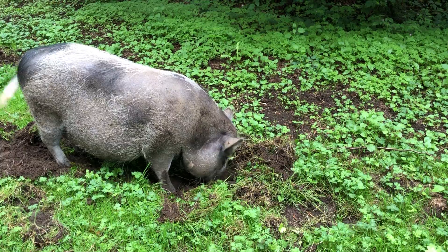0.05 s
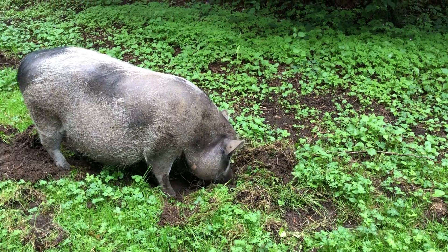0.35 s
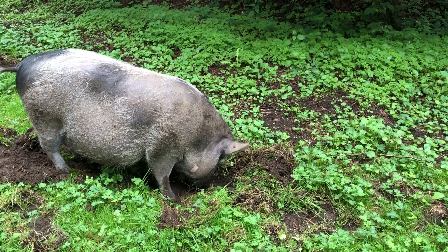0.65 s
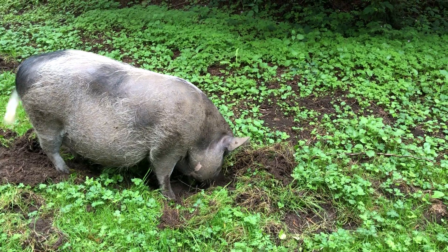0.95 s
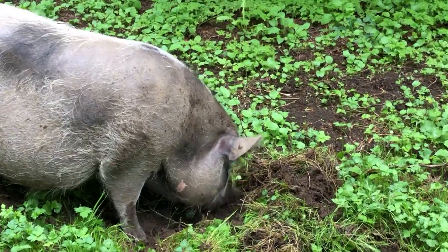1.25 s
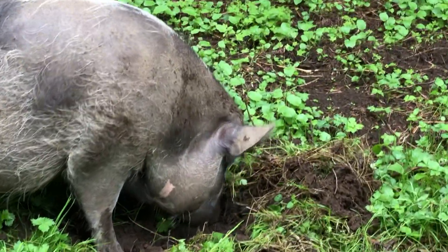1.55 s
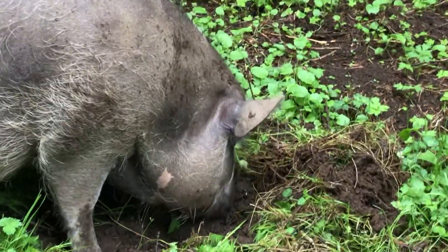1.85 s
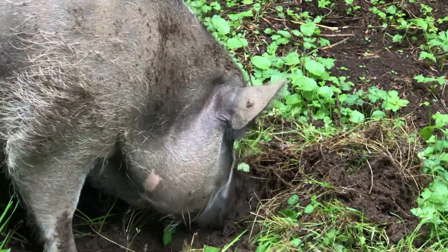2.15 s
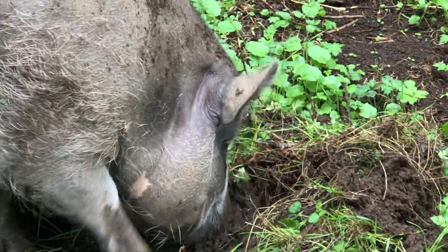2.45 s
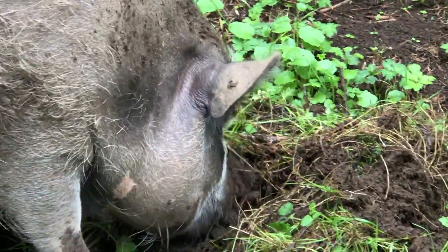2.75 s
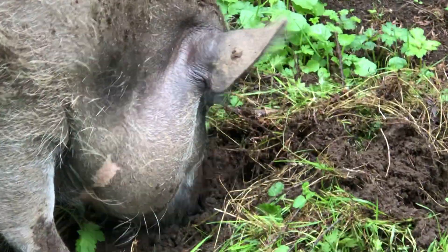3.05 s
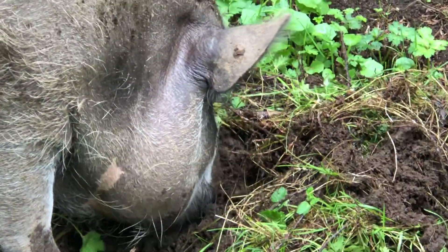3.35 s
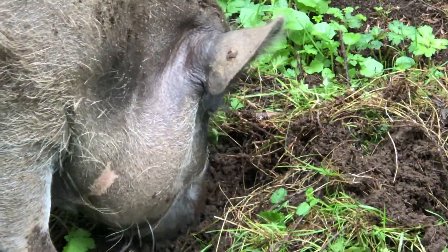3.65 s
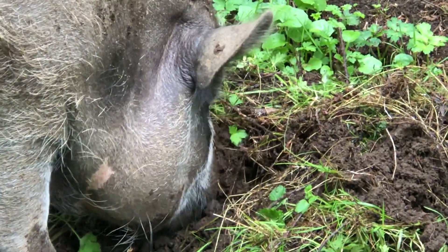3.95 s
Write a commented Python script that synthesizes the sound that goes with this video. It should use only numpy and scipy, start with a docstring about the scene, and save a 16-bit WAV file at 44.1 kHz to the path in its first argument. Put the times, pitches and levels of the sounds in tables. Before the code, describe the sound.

A pig digging with its snout, shoving earth and snapping roots over a distant rumble.

```python
"""A steady distant rumble and soft hiss, over which a pig roots in damp soil among low plants.
Soil and stalks rustle as crumbs break and blades are brushed. Small roots snap, each with a crack,
a short ring and a knock. The snout shoves clods with dull thuds.
Twice a small bird gives a thin note, then a rising whistle, reflected and scattered by trees.
A brief high squeak sounds at the top of the first whistle."""
import sys
import numpy as np
from scipy import signal
from scipy.fft import rfft, irfft
from scipy.io import wavfile

SR = 44100
rng = np.random.default_rng(int(sys.argv[2]) if len(sys.argv) > 2 else 0)


def unload_audio(sound):
    """Save the sound as a 16-bit wav file, at the path given as the first command line argument."""
    columns = np.transpose(np.atleast_2d(sound))
    # keep every value between -1 and 1, then stretch to whole-number steps
    steps = np.round(np.clip(columns, -1, 1) * 32767)
    wavfile.write(sys.argv[1], SR, steps.astype(np.int16))


N = 176400
T = np.arange(N) / SR

# distant rumble spectrum (frequency [Hz], density [dB/Hz])
RUMBLE_SPECTRUM = [(15, -115), (30, -95), (42, -84.5), (51, -77.5), (65, -74.5), (93, -69.5), (108, -68.5),
                   (135, -65.5), (160, -67), (210, -72), (320, -72), (400, -76.5), (540, -78.5),
                   (630, -85.5), (760, -79), (860, -83), (1100, -88.5), (1600, -88.5), (1900, -92.5),
                   (2250, -90.5), (2550, -102), (4000, -112), (8000, -135)]
# outdoor hiss spectrum at mid-scene (frequency [Hz], density [dB/Hz])
HISS_SPECTRUM = [(100, -108), (1500, -99), (2700, -95), (3500, -95.5), (4600, -98), (5120, -103.5),
                 (5530, -95.5), (6050, -101), (6650, -100.5), (8200, -105), (9400, -105.5), (11000, -110.5),
                 (12000, -108.5), (13000, -109.5), (15800, -108)]
# narrow drones in the rumble (frequency [Hz], resonator width [Hz], rms [dB])
RUMBLE_DRONES = [(105.65, 3.6, -52), (125.8, 8.3, -56.5), (177, 5.4, -59.5), (1000, 20, -68)]
# soil and stalk rustles (centre [s], length [s], soil rms at centre [dB], blades re soil [dB])
RUSTLE_SWELLS = [(0.112, 0.2, -53.5, -21), (0.367, 0.047, -59, 1), (.69, .3, -66, -10.5),
                 (2.373, .13, -59.5, -13)]
# root and stalk snaps (time [s], ring peak [dB], ring [Hz], ring Q [-], crack re ring [dB], tear [s])
ROOT_SNAPS = [(.0618, -44.5, 8400, 8, -20, .0008), (.0648, -39.5, 3700, 3, -22, .0006),
              (.0672, -38, 2900, 8, -24, .0006), (.1235, -47, 6000, 2, 0, .0006),
              (.1300, -45, 3100, 7, -22, .0006), (.1678, -46, 8400, 8, -14, .0008),
              (.3618, -38.5, 3350, 7, -16, .0006), (.3836, -38.5, 3400, 6, -13, .0005),
              (.3975, -49, 7500, 3, -16, .0006), (.5900, -44, 4200, 8, -20, .0005),
              (.6088, -47, 3800, 2, -14, .0004), (.6125, -45.5, 4400, 3, -18, .0008),
              (.6512, -43, 6700, 6, -20, .0007), (.6577, -45, 4800, 3, -16, .0003),
              (.6630, -42, 4700, 4, -18, .0005), (.6690, -46, 3900, 5, -20, .0009),
              (.6768, -48, 5000, 2, 0, .0003), (.6990, -50, 7000, 2, 4, .0004),
              (.7035, -48, 3900, 4, -20, .0009), (.7120, -43.5, 4800, 3, -16, .00087),
              (.7226, -48, 4400, 2, -1, .0003), (.7537, -50, 9000, 5, 11, .00083),
              (.7690, -45, 6500, 2, -3, .0003), (.7780, -48, 6200, 6, -16, .0004),
              (1.0235, -48, 3580, 3.5, -22, .0007), (1.1667, -43, 4500, 2.3, -16, .0002),
              (1.7667, -44, 3600, 2, -22, .0002), (1.8039, -33, 3030, 2.3, -16, .00011),
              (1.8684, -32, 3600, 1.1, -26, .00016), (1.8789, -34, 4500, 1.2, -24, .00015),
              (2.3446, -49, 6000, 2, 0, .0003), (2.5564, -41, 3800, 5, -14, .0002),
              (2.5667, -44, 3600, 3, -13, .0002), (2.7938, -32.3, 5400, 1.7, -1.5, .0012)]
# bird calls (rise start [s], level [dB], lead note [Hz], lead note re level [dB])
BIRD_CALLS = [(.294, -58, 4570, -5), (3.323, -53.5, 4380, -9)]
# whistle pitch contour (time after rise start [s], pitch [Hz])
RISE_CONTOUR = [(0, 4500), (.024, 4820), (.039, 5300), (.050, 5950), (.056, 6480), (.066, 6720)]
# snout shoves (centre [s], length [s], rms at centre [dB])
SNOUT_SHOVES = [(0.396, 0.24, -43), (0.963, .12, -47), (1.154, 0.18, -46.5), (1.525, 0.18, -52),
                (1.784, 0.15, -49), (3.26, 0.17, -52), (3.68, 0.74, -50)]
# resonances of the high squeak (frequency [Hz], width [Hz], rms at centre of squeak [dB])
SQUEAK_MODES = [(3300, 400, -60), (6030, 110, -57), (6750, 350, -60.5)]

CUTOFF_HZ = 15900


def from_db(db):
    """Decibels to gain."""
    return 10 ** (np.asarray(db) / 20)


def unit_rms(x):
    """Scale to rms 1."""
    return x / np.sqrt(np.mean(x ** 2) + 1e-20)


def resonate(x, hz, width_hz):
    """Two-pole resonance, peak gain 1."""
    r, w = np.exp(-np.pi * width_hz / SR), 2 * np.pi * hz / SR
    return signal.lfilter(np.array([1, 0, -1]) * (1 - r * r) / 2, [1, -2 * r * np.cos(w), r * r], x + 1e-18)


def band(x, low_hz, high_hz):
    """Gentle band-pass."""
    return signal.sosfilt(signal.butter(2, [low_hz, high_hz], "band", fs=SR, output="sos"), x + 1e-18)


def coloured_noise(spectrum):
    """Steady noise of the given spectrum."""
    hz, db = np.transpose(spectrum)
    bins_hz = np.arange(N // 2 + 1) * SR / N
    gain = from_db(np.interp(np.log(bins_hz + 1e-3), np.log(hz), db))
    return irfft(rfft(rng.standard_normal(N)) * gain, N) * np.sqrt(SR / 2)


def swell(centre_s, length_s):
    """Parabolic envelope, peak 1."""
    return np.clip(1 - (2 * (T - centre_s) / length_s) ** 2, 0, 1)


def grains(per_s, spread_db=2.5):
    """Random clicks of uneven size."""
    hits = rng.random(N) < per_s / SR
    sizes = from_db(spread_db * np.minimum(rng.exponential(1, N), 4))
    return hits * sizes * rng.choice([-1, 1], N)


def outdoors(hiss_fade_db_per_s=0.24):
    """Far rumble with wavering drones; soft hiss, slowly easing."""
    drones = sum(from_db(db) * unit_rms(resonate(resonate(rng.standard_normal(N), hz, width), hz, width))
                 for hz, width, db in RUMBLE_DRONES)
    hiss = coloured_noise(HISS_SPECTRUM) * from_db(-hiss_fade_db_per_s * (T - T.mean()))
    return coloured_noise(RUMBLE_SPECTRUM) + hiss + drones


def crumbs(per_s, q=2.4, gain_db_per_octave=-7.5):
    """Soil crumbs break, each ringing a few cycles at its own pitch; high ones are softer."""
    pitches_hz = [1130, 1750, 2540, 3280, 4350, 5870, 8200]
    soil = np.zeros(N)
    for hz in pitches_hz:
        breaks = grains(per_s / len(pitches_hz), spread_db=3)
        soil += from_db(gain_db_per_octave * np.log2(hz / pitches_hz[0])) * resonate(breaks, hz, hz / q)
    return unit_rms(soil)


def rustles(blade_low_hz=10300, stray_db=-75):
    """Pushes break crumbs and brush fine blades; stray crumbs fall in between."""
    soil = crumbs(per_s=7000)
    blades = unit_rms(band(grains(per_s=1800), blade_low_hz, CUTOFF_HZ))
    pushes = sum(from_db(db) * swell(centre_s, length_s) * (soil + from_db(blades_db) * blades)
                 for centre_s, length_s, db, blades_db in RUSTLE_SWELLS)
    return pushes + from_db(stray_db) * crumbs(per_s=55)


def snaps(ring_top_hz=9150, crack_low_hz=9200):
    """Fibres give way in about a millisecond: bright crack, short woody ring, knock in the soil."""
    out, t = np.zeros(N + SR), T[:SR // 50]
    damping = signal.butter(8, ring_top_hz, fs=SR, output="sos")
    for time_s, db, hz, q, crack_db, tear_s in ROOT_SNAPS:
        tear = rng.choice([-1, 1], len(t)) * np.exp(-(t / tear_s) ** 2)
        tear[0] = 3  # sharp onset
        ring = band(resonate(tear, hz, hz / q), 0.4 * hz, CUTOFF_HZ)  # little radiates far below pitch
        ring = signal.sosfilt(damping, ring)
        crack = band(tear, crack_low_hz, CUTOFF_HZ)
        knock = resonate(tear, hz=1300, width_hz=800)
        knock_db = -5 - 14 * np.log2(hz / 3500)  # thinner, higher fibres knock less
        start = int(time_s * SR)
        for part, part_db in (ring, 0), (crack, crack_db), (knock, knock_db):
            out[start:start + len(t)] += from_db(db + part_db) * part / abs(part).max()
    return out[:N]


def whistle(hz, waver_rms_hz=40):
    """Sine with a slight random pitch waver."""
    waver = unit_rms(band(rng.standard_normal(N), low_hz=9, high_hz=90))
    return np.sin(2 * np.pi * np.cumsum(hz + waver_rms_hz * waver) / SR)


def bird(lead_ahead_s=0.153, lead_s=0.065, rise_s=0.069, rise_swell_db=7):
    """Faint level note, then a whistle that swells as it flicks up."""
    song = np.zeros(N)
    contour_s, contour_hz = np.transpose(RISE_CONTOUR)
    for start_s, db, lead_hz, lead_db in BIRD_CALLS:
        song += from_db(db + lead_db) * swell(start_s - lead_ahead_s + lead_s / 2, lead_s) * whistle(lead_hz)
        hz = np.interp(T - start_s, contour_s, contour_hz)
        below_top = (contour_hz.max() - hz) / np.ptp(contour_hz)
        envelope = np.sqrt(swell(start_s + rise_s / 2, rise_s))
        song += from_db(db - rise_swell_db * below_top) * envelope * whistle(hz)
    return song


def among_trees(song, delay_s=0.013, reflection_db=-10, decay_s=0.035, scatter_db=-4):
    """Direct song plus one reflection and a scattered tail from the trees."""
    reflection = from_db(reflection_db) * np.interp(T - delay_s, T, song)
    tail = rng.standard_normal(SR // 2) * np.exp(-T[:SR // 2] / decay_s)
    scatter = from_db(scatter_db) * signal.fftconvolve(song, tail / np.linalg.norm(tail))[:N]
    return song + reflection + scatter


def shoves():
    """The snout shifts clods: dull, crowded thuds."""
    clods = unit_rms(band(grains(per_s=1500), low_hz=156, high_hz=372))
    return clods * sum(from_db(db) * swell(centre_s, length_s) for centre_s, length_s, db in SNOUT_SHOVES)


def squeak():
    """Brief high squeak at the top of the bird's first whistle."""
    clicks = grains(per_s=1500)
    ring = sum(from_db(db) * unit_rms(resonate(clicks, hz, width_hz)) for hz, width_hz, db in SQUEAK_MODES)
    return swell(centre_s=0.371, length_s=0.028) * ring


def scene():
    """Pig and bird in the open air, mono."""
    return (outdoors() + rustles() + snaps() + among_trees(bird()) + shoves() + squeak())[None]


def record(dry):
    """Brief opening silence; steep low-pass."""
    silence_s = 0.036
    low_pass = signal.ellip(12, 0.1, 70, CUTOFF_HZ, fs=SR, output="sos")
    return signal.sosfilt(low_pass, dry * (T >= silence_s))


dry = scene()
out = record(dry)
unload_audio(out)
```